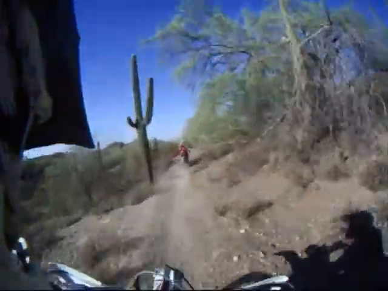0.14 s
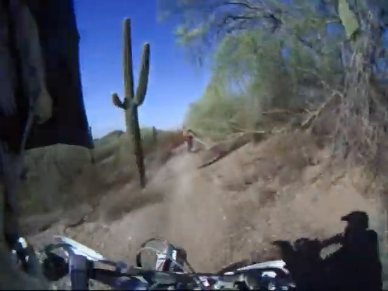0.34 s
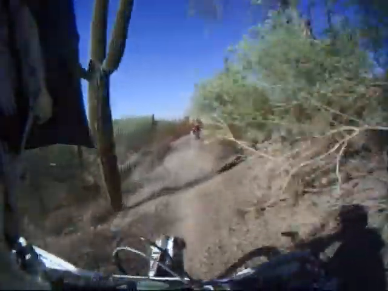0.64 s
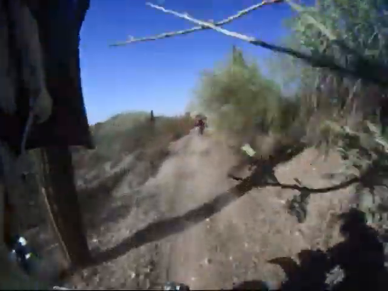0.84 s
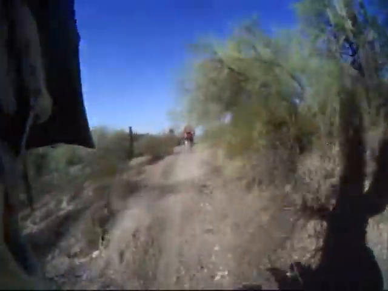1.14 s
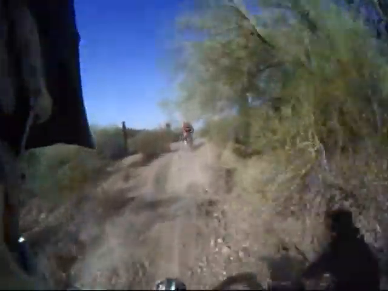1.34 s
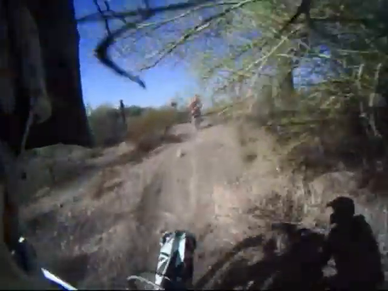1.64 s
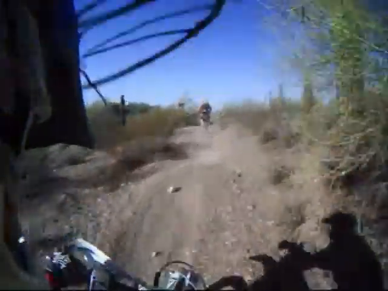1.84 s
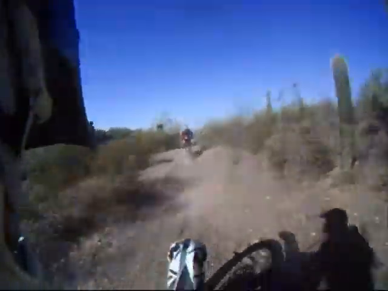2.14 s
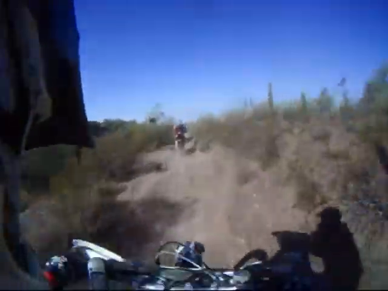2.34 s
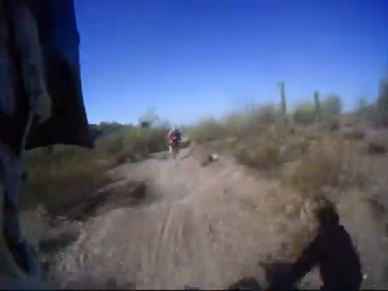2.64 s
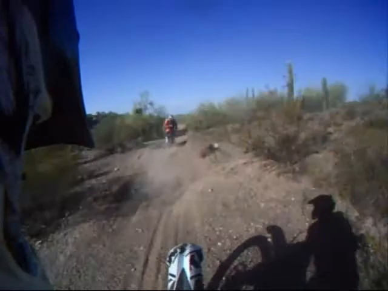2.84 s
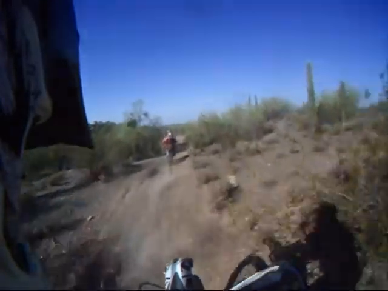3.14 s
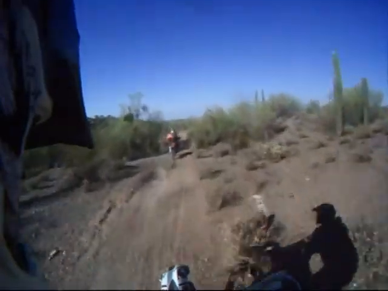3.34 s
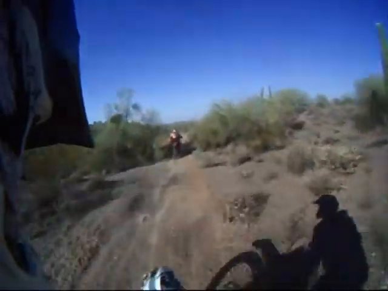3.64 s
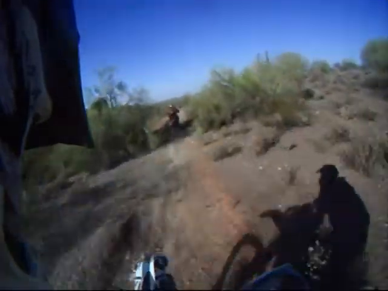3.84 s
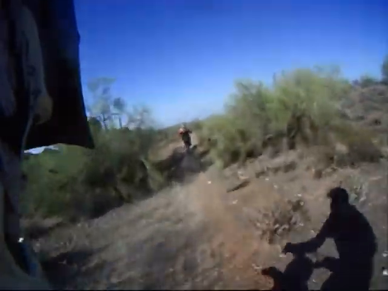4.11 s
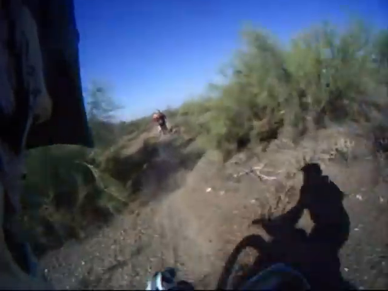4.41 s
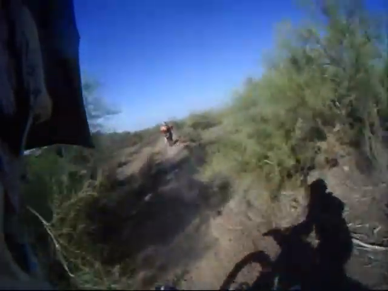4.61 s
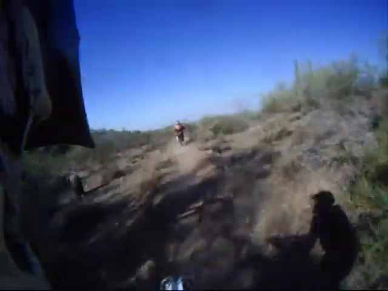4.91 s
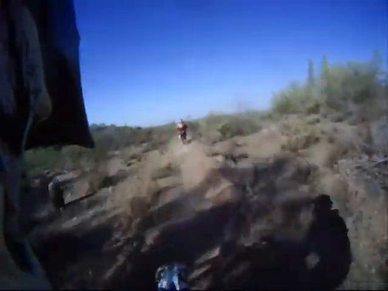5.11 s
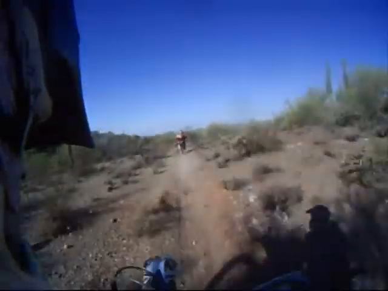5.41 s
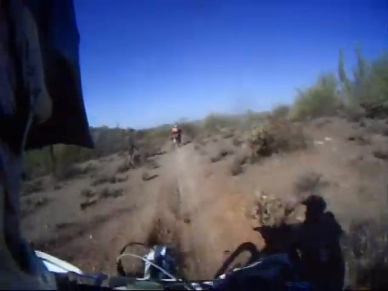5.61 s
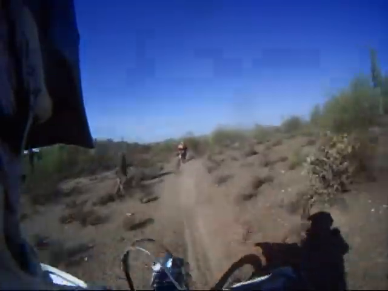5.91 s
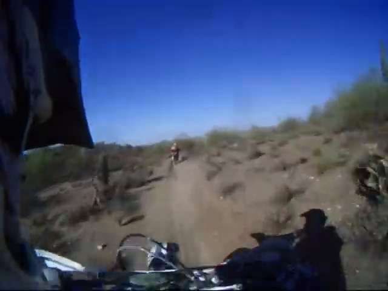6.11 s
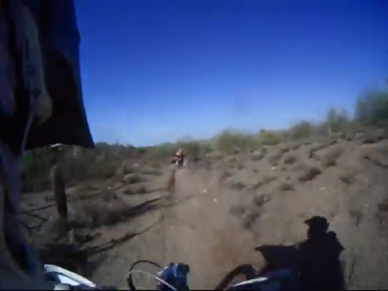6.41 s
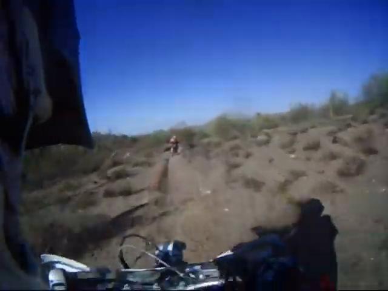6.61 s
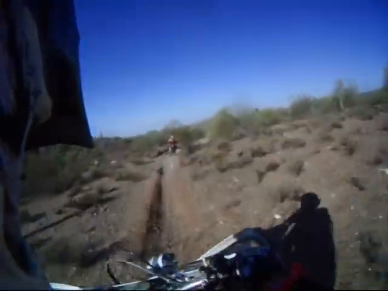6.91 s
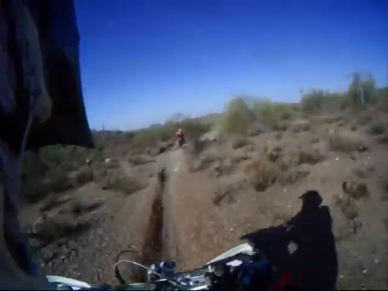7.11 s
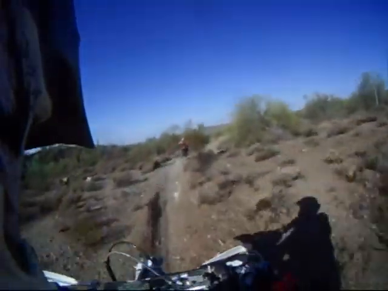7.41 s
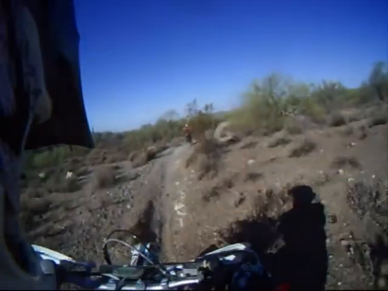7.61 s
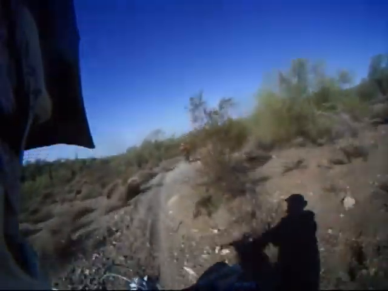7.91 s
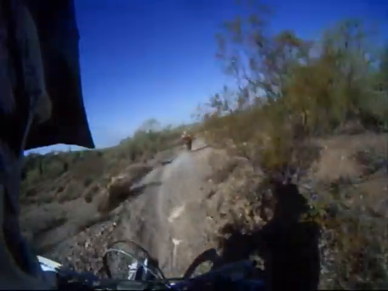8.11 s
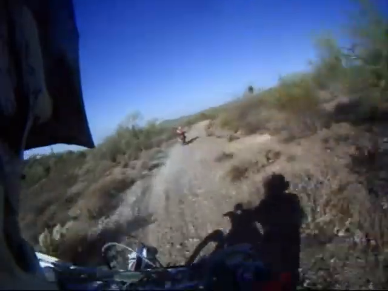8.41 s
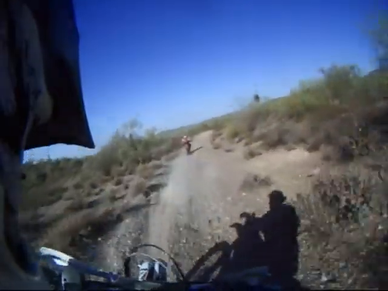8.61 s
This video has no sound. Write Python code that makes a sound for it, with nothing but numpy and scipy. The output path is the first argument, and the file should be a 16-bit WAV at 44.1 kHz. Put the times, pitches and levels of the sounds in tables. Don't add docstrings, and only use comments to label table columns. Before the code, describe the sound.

A single-cylinder off-road motorcycle growls close below a cheap, muffled, gritty microphone. Its throttle blips jump and fall unevenly, with rattling valves, low mount vibration and lumpy wind buffeting. A scratch comes near one second, and violent clipped branch strikes burst out around two. The engine then flares repeatedly, settles to a lower rumble, revs again, and finishes faster, rougher and briefly misfiring, in open dry country.

```python
import sys
import numpy as np
from scipy import signal
from scipy.io import wavfile
from scipy.ndimage import uniform_filter1d

SR = 44100
rng = np.random.default_rng(int(sys.argv[2]) if len(sys.argv) > 2 else 0)


def how_loud(loudness_db):
    steps = np.asarray(loudness_db, float) / 20
    return 10 ** steps


def transcribe(u):
    v = np.clip(np.atleast_2d(u).T, -1, 1)
    q = np.round(v * 32767).astype(np.int16)
    wavfile.write(sys.argv[1], SR, q)


N = 385875
T = np.arange(N) / SR
SLOW = T[::64]
COUPLING_HZ = 56.2
CLEAN_OPEN = .85


def engine():
    exhaust_gain, clatter_gain, clean = throttle()
    hz = speed()
    turns, fired, burn = firings(hz, clean)
    return exhaust_gain * exhaust(fired, hz, clean) + clatter_gain * clatter(turns, burn)


def throttle():
    # (open [s], rise [s], hold [s], exhaust level [dB], clatter level [dB])
    openings = [(.05, .03, 0.2, -28.5, -35.5), (0.153, 0.19, .07, -23.5, -32),
                (2.094, 0.013, 0.045, -34, -31), (2.525, 0.047, 0.17, -22.5, -30),
                (2.674, 0.064, .11, -31.5, -30), (2.858, 0.057, 0.14, -31, -36.5),
                (3.09, .14, 0.36, -23, -28.5), (3.55, 0.049, 0.075, -31.5, -32.5),
                (3.866, 0.018, 0.045, -27, -37), (3.92, 0.017, .14, -24.5, -30.5),
                (3.94, .15, 0.1, -23.5, -28.5), (4.15, 0.048, 0.14, -34, -30.5),
                (5.498, 0.094, 0.46, -29.5, -37), (5.753, 0.26, .1, -22.5, -33),
                (6.1, 0.085, 0.463, -27, -36), (6.22, 0.17, .07, -23.5, -31),
                (6.887, 0.0079, 0.032, -26, -34.5), (7.164, 0.038, 0.21, -27, -35),
                (7.44, .02, 0.11, -31.5, -35.5), (7.735, .02, 0.26, -31, -36.5),
                (7.998, 0.33, .5, -36.5, -38)]
    # (time [s], exhaust level [dB], clatter level [dB])
    pops = [(0, -19.5, -29), (.826, -30, -33.5), (1.208, -39, -33), (2.437, -28, -30), (2.484, -29, -32),
            (2.965, -27, -24.5), (3.049, -27, -27), (3.095, -29, -27), (5.135, -32, -36.5),
            (5.615, -21.5, -30.5), (6.665, -31, -29), (7.214, -25, -36), (7.447, -20, -30),
            (7.745, -26, -31)]
    idle_db, idle_clatter_db = -39, -38.5
    exhaust_shut_s, clatter_shut_s, pop_s = 0.054, 0.1, 0.016
    exhaust_lead_s, clatter_jump = 0.07, 0.66
    firing_db = -30.5
    clean_shut, clean_ragged, ragged_from_s = .45, .62, 6.8
    pipe_gain = np.full(N, how_loud(idle_db))
    valve_gain = np.full(N, how_loud(idle_clatter_db))
    opened = np.zeros(N)
    for start, rise, hold, exhaust_db, clatter_db in openings:
        full, shut = start + rise, start + rise + hold
        on = ramp(start - exhaust_lead_s, full, shut, exhaust_shut_s)
        jump = clatter_jump * ramp(start - .002, start, shut, clatter_shut_s)
        valves_on = np.maximum(jump, ramp(start, full, shut, clatter_shut_s))
        pipe_gain = np.maximum(pipe_gain, how_loud(exhaust_db) * on)
        valve_gain = np.maximum(valve_gain, how_loud(clatter_db) * valves_on)
        opened = np.maximum(opened, on * (exhaust_db > firing_db))
    for s, exhaust_db, clatter_db in pops:
        on = ramp(s - .002, s, s, pop_s)
        pipe_gain = np.maximum(pipe_gain, how_loud(exhaust_db) * on)
        valve_gain = np.maximum(valve_gain, how_loud(clatter_db) * on)
    top = np.where(T > ragged_from_s, clean_ragged, CLEAN_OPEN)
    return pipe_gain, valve_gain, clean_shut + (top - clean_shut) * opened


def speed():
    # (time [s], firing rate [1/s])
    cruise = [(0, 47), (.62, 48), (1.76, 48.5), (2.12, 52), (2.42, 46.7), (3.15, 45.5), (3.8, 46.5),
              (4.4, 44), (4.62, 45.5), (5.68, 44.6), (5.9, 46.8), (6.3, 47.5), (6.8, 49.5), (7.2, 62),
              (7.9, 64), (8.37, 59.5), (8.53, 63), (8.75, 58.4)]
    # (slip [s], grip [s], gain in firing rate [1/s])
    spins = [(.04, .11, 3.5), (.16, .41, 9), (.41, .49, 5), (2.49, 2.75, 31), (2.75, 2.8, 11),
             (3.14, 3.39, 13.5), (3.39, 3.41, 1.5), (3.465, 3.56, 14), (3.84, 4.11, 21.5),
             (4.11, 4.17, 9.5), (4.17, 4.215, 11), (5.9, 5.97, 4.5), (5.97, 6.105, 8), (6.31, 6.465, 10.5),
             (6.47, 6.55, 2), (6.615, 6.66, 3.5), (6.82, 6.915, 4.5)]
    grip_s = .11
    hz, = curves(cruise)
    for slip, grip, gain in spins:
        hz = hz + gain * ramp(slip, grip, grip, grip_s)
    return uniform_filter1d(hz, size=800)


def firings(hz, clean):
    # (from [s], to [s])
    misfires = [
        (7.2, 7.5),
        (7.74, 8.05),
    ]
    rough = CLEAN_OPEN - clean
    turns = np.cumsum(hz * (1 + (.004 + .05 * rough ** 2) * drift(40))) / SR
    fired = np.diff(np.floor(turns), prepend=0) * how_loud((1 + 5 * rough) * drift(70))
    weak = sum((T > a) & (T < b) for a, b in misfires) * (np.floor(turns) % 2)
    burn = 1 - .8 * weak
    return turns, fired * burn, burn


def exhaust(fired, hz, clean):
    # (frequency [Hz], width [Hz], level [dB])
    pipe = [(159, 178, -0.5), (272.3, 89, 4), (513, 138, -1), (716.5, 29, -1), (760, 21, -18.5)]
    # (frequency [Hz], width [Hz], level [dB])
    helmet = [(195, 106, -2), (328, 176, -0.5), (426, 106, -1.5), (642, 290, -15), (968, 23, -16.5)]
    # (from [s], lower [ratio], upper [ratio])
    standing_orders = [(0, 6, 9.7), (.24, 5, 9), (.55, 7, 8.5), (2.45, 3.6, 9), (2.62, 3, 7.5),
                       (2.73, 3, 6), (3.0, 5, 9.3), (3.3, 5.5, 9), (3.5, 4, 7.3), (3.65, 3.5, 9),
                       (3.87, 4.5, 9), (3.99, 4, 7), (4.4, 5.5, 10), (5.6, 5.8, 10.7), (5.76, 5.4, 11),
                       (5.94, 5, 8), (6.26, 5, 11), (6.34, 5, 8), (6.8, 4, 9), (7.0, 3.5, 7.7),
                       (7.7, 3.7, 8.5), (8.05, 4.5, 7)]
    since, *orders = np.transpose(standing_orders)
    current = np.array(orders)[:, np.searchsorted(since, T, "right") - 1]
    lower_hz, upper_hz = hz * uniform_filter1d(current, size=1500)
    standing = resonate(fired, lower_hz, 65) - .95 * resonate(fired, upper_hz, 70)
    standing = evened(standing + .4 * resonate(fired, .96 * (lower_hz + upper_hz), 90))
    body = evened(band(ring(fired, pipe), 97, 940))
    pulses = -steadied(standing + how_loud(-4) * body)
    roar = steadied(band(ring(rng.standard_normal(N), helmet), 179, 970)) * how_loud(3.6 * drift(106))
    return np.sqrt(clean) * pulses + (1 - clean) ** .7 * roar


def clatter(turns, burn):
    # (frequency [Hz], width [Hz], level [dB])
    case = [(974, 200, -3.5), (1480, 180, -33), (1542, 310, 8.5), (2420, 100, -22.5), (2480, 740, 2),
            (2963, 94, 14), (3130, 161, 7), (3547, 130, -2.5)]
    beat = 1 + .5 * np.exp(-(turns % 1) / 0.033) + 0.63 * np.exp(-((turns + 0.61) % 1) / 0.79)
    beat *= np.sqrt(burn)
    hits = (rng.random(N) < 45 / SR) * np.minimum(rng.exponential(.4, N), .6)
    knocks = signal.lfilter([1], [1, -np.exp(-1 / (.012 * SR))], hits)
    rattle = rng.standard_normal(N) * (beat + knocks) * how_loud(0.79 * drift(100))
    return steadied(ring(rattle, case), 0.15)


def mount():
    # (time [s], frequency [Hz])
    shake_hz = [(0, 50.1), (.44, 56.4), (.58, 49.9), (1.08, 46.55), (1.76, 49.63), (2.17, 54.84),
                (2.45, 42), (2.9, 49.5), (3.2, 44.5), (3.45, 55.5), (3.85, 44.84), (4.4, 43.96),
                (5.24, 45.44), (5.65, 43.5), (6.1, 52.03), (6.9, 51.7), (7.6, 62.5), (8.75, 59.8)]
    # (peak [s], rise [s], fall [s], level [dB])
    swells = [(0.082, .2, 0.16, -13.5), (.36, 0.2, 0.17, -22), (.8, 0.33, 0.096, -11),
              (1.04, 0.23, 0.032, -19.5), (1.6, 0.47, 0.69, -14.5), (2.28, 0.1, .15, -17),
              (2.64, 0.18, 0.039, -24.5), (2.96, 0.085, .28, -16), (3.3, 0.12, 0.096, -20.5),
              (3.53, 0.13, 0.064, -22.5), (3.69, 0.037, 0.22, -24), (3.97, .19, 0.097, -21.5),
              (4.23, .05, 0.12, -19), (4.55, .15, .45, -19), (5.2, 0.83, 0.24, -16.5),
              (5.55, 0.19, 0.17, -26), (5.95, 0.31, .25, -28.5), (6.23, 0.045, 0.044, -22.5),
              (6.32, 0.058, .16, -22.5), (6.68, 0.16, 0.13, -23.5), (6.88, 0.18, 0.087, -11.5),
              (7.04, 0.06, 0.11, -22.5), (7.199, 0.068, 0.092, -30), (7.37, 0.082, 0.051, -33),
              (7.56, .12, 0.044, -25), (7.65, .05, 0.14, -23), (7.92, 0.14, 0.1, -29.5),
              (8.33, 0.21, 0.13, -19), (8.54, 0.14, .12, -28.5), (8.68, 0.062, .12, -22.5)]
    # (start [s], upward zero crossing [s], frequency [Hz], level [dB], held [s], t60 [s])
    swings = [
        (1.812, 1.8715, 48.9, 12, .125, .2),
        (2.012, 2.0595, 48.3, 13, .035, .27),
        (4.392, 4.4205, 43, -2, .04, .06),
        (4.37, 4.385, 10.4, -1.5, .13, .12),
        (4.435, 4.4605, 46, -8, .055, .3),
    ]
    hz, = curves(shake_hz)
    shapes = np.array([swell(*row[:3]) for row in swells])
    size = tallest(np.transpose(swells)[3], shapes) + how_loud(-48)
    sine = np.sin(2 * np.pi * np.cumsum(hz) / SR)
    shake = np.sqrt(2) * size * how_loud(2.0 * drift(22.3)) * uncoupled(hz) * sine
    swinging, calm = np.zeros(N), np.ones(N)
    for start, cross, swing_hz, swing_db, held, t60 in swings:
        on = np.clip((T - start) / 0.019, 0, 1) * how_loud(-60 * np.maximum(T - start - held, 0) / t60)
        swinging += how_loud(swing_db) * on * np.sin(2 * np.pi * swing_hz * (T - cross))
        calm *= 1 - np.minimum(9.2 * on, 1)
    return shake * calm + swinging


def branches():
    # (frequency [Hz], width [Hz], level [dB])
    twigs = [(599, 220, -2.5), (1545, 310, 1), (2490, 220, 8.5), (3094, 500, 3.5)]
    # (start [s], length [s], level [dB], fade over the length [dB])
    whips = [(0.051, 0.019, -28, 10), (2.531, 0.026, -28.5, 8), (3.928, 0.013, -22.5, 15),
             (4.515, 0.025, -33, 8), (0.706, 0.013, -34, 4), (0.995, 0.01, -7.5, 8),
             (1.0055, 0.025, -5.5, 16.5), (1.043, 0.013, -32, -1), (1.531, 0.0083, -23, 9),
             (1.771, 0.027, -30.5, -20.5), (1.786, 0.0015, -4, -10.5), (1.7995, .013, 2, 3),
             (1.8125, .013, 3, 5), (1.8385, .0155, 14, 0), (1.894, .026, 16, 10), (2.0105, .041, 14, 0),
             (2.483, .012, -41, 14), (4.21, 0.026, -32, 0), (6.891, .015, -31, 13)]
    grit = rng.standard_normal(N) * how_loud(1.9 * drift(750))
    scratch = steadied(ring(grit, twigs) + how_loud(-17) * grit, 0.028)
    level = np.zeros(N)
    for start, length, db, fade_db in whips:
        u = (T - start) / length
        attack = np.clip((T - start) / 0.00013, 0, 1)
        release = np.clip((1 - u) * length / 0.00079, 0, 1)
        level += how_loud(db - fade_db * np.clip(u, 0, 1)) * attack * release
    return level * scratch


def wind():
    # (peak [s], half length [s], slow push level [dB], flutter level [dB])
    gusts = [(.1, .2, -34, -35), (0.367, .08, -37, -41), (0.687, 0.19, -26, -37), (1.121, 0.16, -46, -35.5),
             (1.28, 0.093, -25, -34), (1.486, .07, -43, -34.5), (1.703, 0.037, -28, -32.5),
             (2.18, 0.22, -25.5, -35.5), (2.383, 0.095, -25, -34.5), (2.53, 0.13, -30, -33),
             (2.76, 0.12, -52, -33.5), (2.945, 0.088, -18.5, -32.5), (3.08, 0.24, -25, -35.5),
             (3.495, 0.088, -38, -31), (3.733, .2, -33, -33.5), (4.217, 0.075, -29.5, -30),
             (4.369, .05, -20.5, -35), (4.618, 0.15, -15, -33), (4.999, 0.33, -29, -44),
             (5.28, .2, -50, -35), (5.797, .1, -50, -35.5), (6.148, 0.051, -16, -35),
             (6.276, 0.057, -15, -31), (6.66, 0.12, -33, -34.5), (6.866, .12, -23, -44),
             (7.152, .15, -34, -35.5), (7.553, 0.26, -35, -35.5), (7.896, 0.16, -31, -32),
             (8.27, 0.19, -24.5, -38), (8.58, 0.14, -31, -36.5)]
    shapes = np.array([swell(s, half, half) for s, half, _, _ in gusts])
    push_db, flutter_db = np.transpose(gusts)[2:]
    push = steadied(band(rng.standard_normal(N), 18, 34), 0.37) * uncoupled(27.6)
    flutter = steadied(band(rng.standard_normal(N), 67, 192), 0.14) * uncoupled(90)
    push_gain = tallest(push_db, shapes) + how_loud(-49)
    flutter_gain = np.maximum(tallest(flutter_db, shapes), how_loud(-37.5))
    return push_gain * push + flutter_gain * flutter


def evened(x):
    return x / np.sqrt(np.mean(x ** 2) + 1e-20)


def steadied(x, span_s=0.0805):
    return x / np.sqrt(uniform_filter1d(x ** 2, int(span_s * SR)) + 1e-20)


def drift(hz):
    size = max(int(SR / hz), 1)
    return evened(uniform_filter1d(uniform_filter1d(rng.standard_normal(N), size), size))


def curves(table):
    s, *columns = np.transpose(table)
    return [np.interp(T, s, c) for c in columns]


def ramp(start, full, shut, release_s):
    return np.clip((T - start) / (full - start), 0, 1) * np.exp(-np.maximum(T - shut, 0) / release_s)


def swell(peak, rise, fall):
    height = np.interp(SLOW, [peak - rise, peak, peak + fall], [0, 1, 0])
    return np.sin(np.pi / 2 * height) ** 0.79


def tallest(db, shapes):
    return np.interp(T, SLOW, (how_loud(db)[:, None] * shapes).max(axis=0))


def ring(x, modes):
    out = np.zeros(len(x))
    for k, (hz, width, db) in enumerate(modes):
        r = np.exp(-np.pi * width / SR)
        poles = [1, -2 * r * np.cos(2 * np.pi * hz / SR), r * r]
        out += (-1) ** k * how_loud(db) * (1 - r) * signal.lfilter([1, 0, -1], poles, x)
    return out


def resonate(x, hz, width):
    spin = np.exp(2j * np.pi * np.cumsum(hz) / SR)
    r = np.exp(-np.pi * width / SR)
    return 2 * (spin * signal.lfilter([(1 - r) ** 2], [1, -2 * r, r * r], x / spin)).real


def band(x, lo_hz, hi_hz, order=3):
    return signal.sosfilt(signal.butter(order, [lo_hz, hi_hz], "band", fs=SR, output="sos"), x)


def uncoupled(hz):
    return np.sqrt(1 + (COUPLING_HZ / hz) ** 2)


def scene():
    return (engine() + mount() + branches() + wind())[None]


def low_pass(x):
    return signal.sosfilt(signal.butter(12, 16230, fs=SR, output="sos"), x)


def record(dry):
    rail, alias_hz, hold_hz = .9, 3860, 8012.8
    railed = np.clip(dry, -rail, rail)
    r = np.exp(-2 * np.pi * COUPLING_HZ / SR)
    coupled = signal.lfilter([1, -1], [1, -r], railed)
    smooth = signal.sosfilt(signal.butter(8, alias_hz, fs=SR, output="sos"), coupled)
    ticks = np.arange(int(N / SR * hold_hz) + 2) / hold_hz
    read = np.interp(ticks, T, smooth[0])
    read *= abs(read) < 1
    held = read[(T * hold_hz).astype(int)]
    held = signal.oaconvolve(held, signal.firwin(255, 15850, fs=SR), "same")
    return low_pass(held[None])


dry = scene()
out = record(dry)
transcribe(out)
```